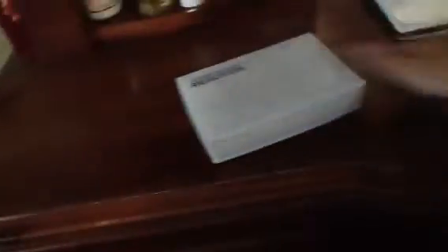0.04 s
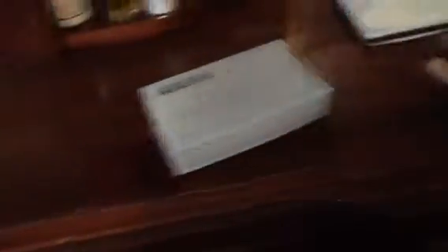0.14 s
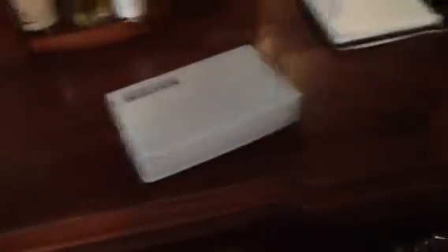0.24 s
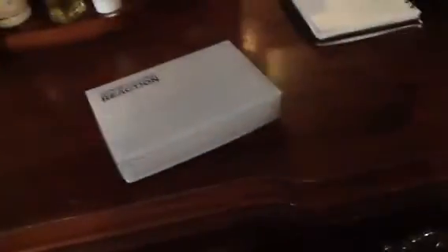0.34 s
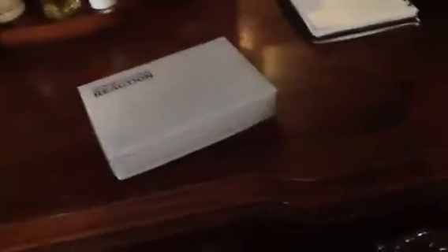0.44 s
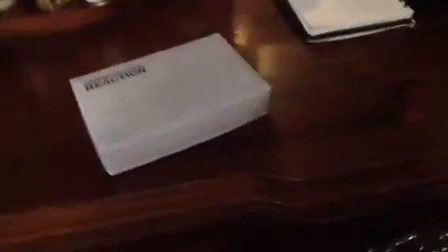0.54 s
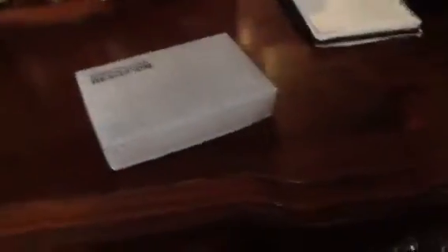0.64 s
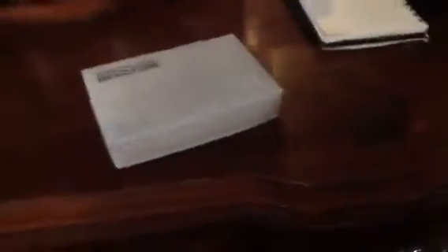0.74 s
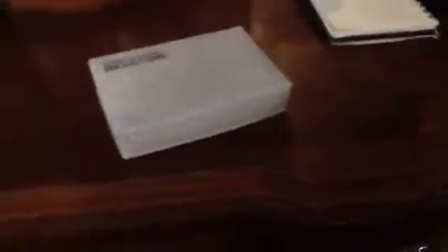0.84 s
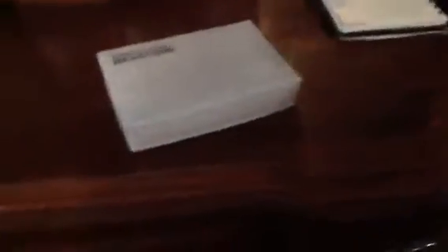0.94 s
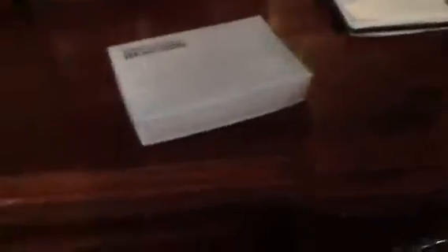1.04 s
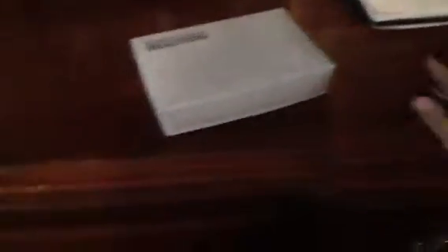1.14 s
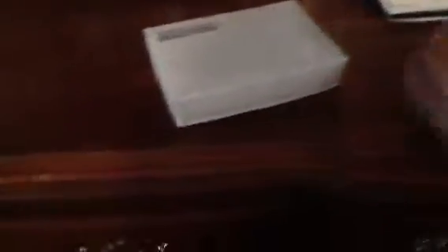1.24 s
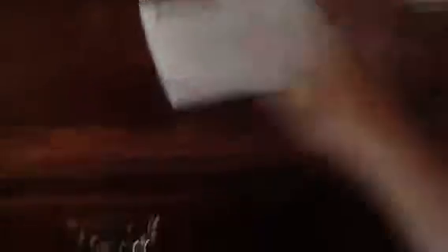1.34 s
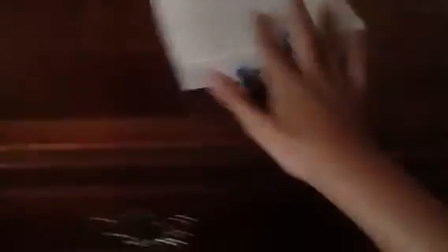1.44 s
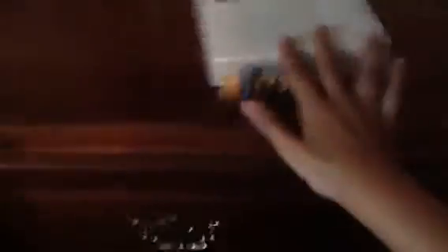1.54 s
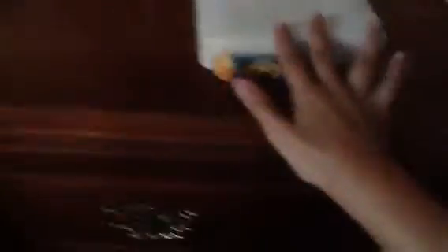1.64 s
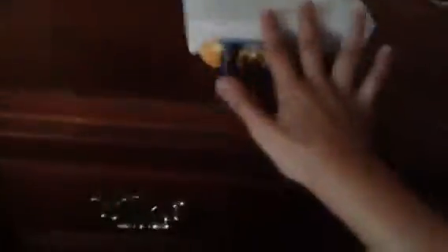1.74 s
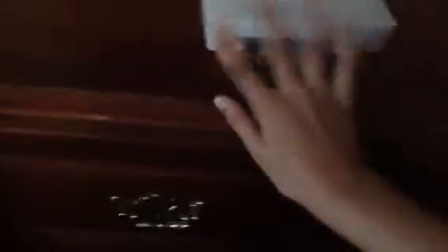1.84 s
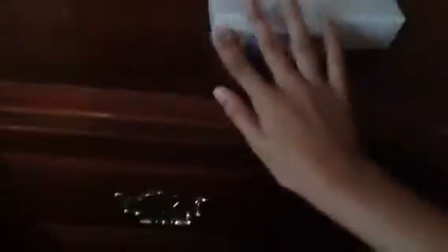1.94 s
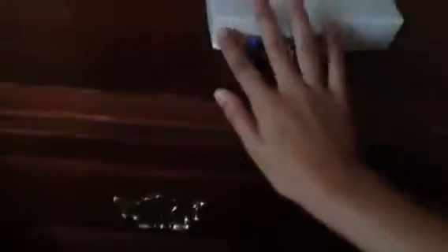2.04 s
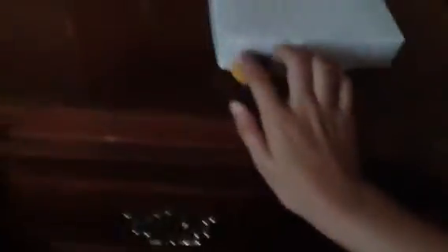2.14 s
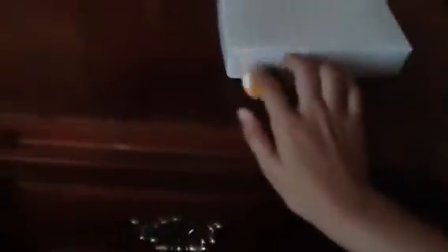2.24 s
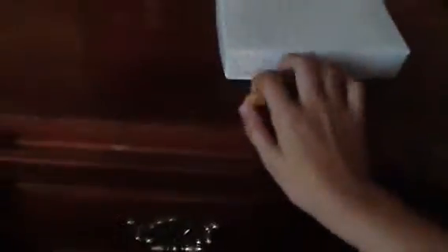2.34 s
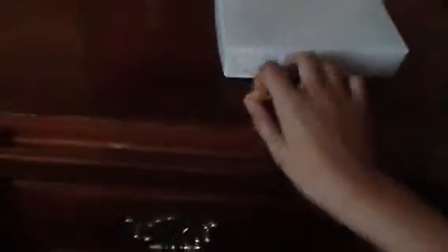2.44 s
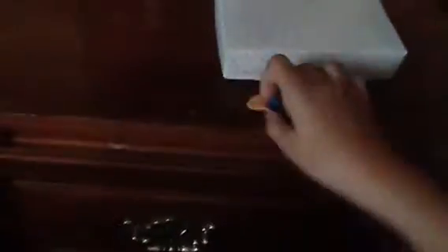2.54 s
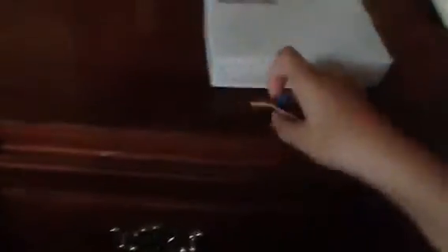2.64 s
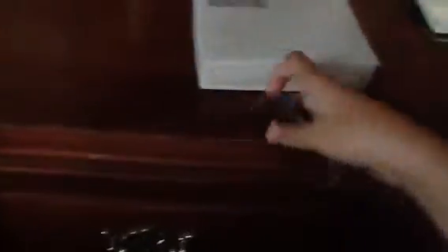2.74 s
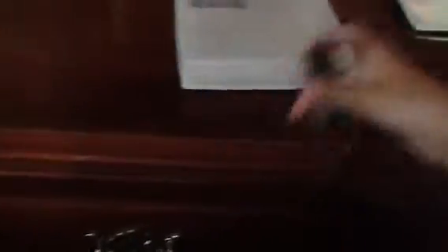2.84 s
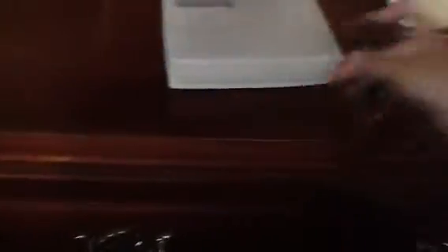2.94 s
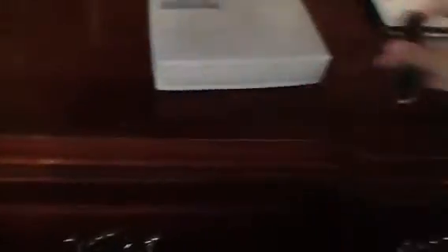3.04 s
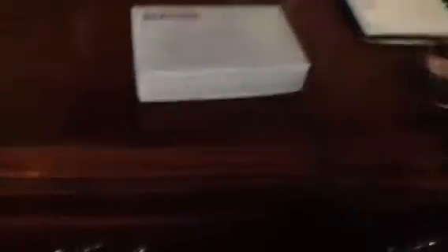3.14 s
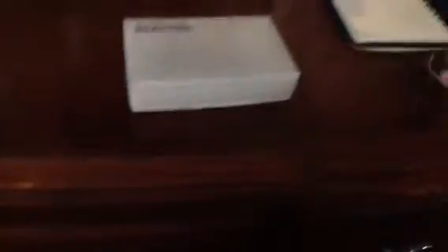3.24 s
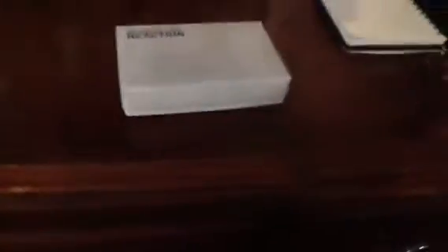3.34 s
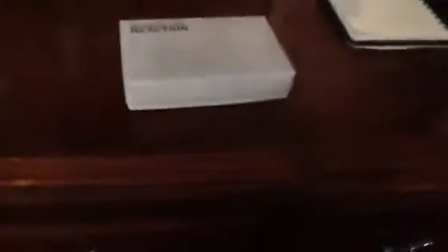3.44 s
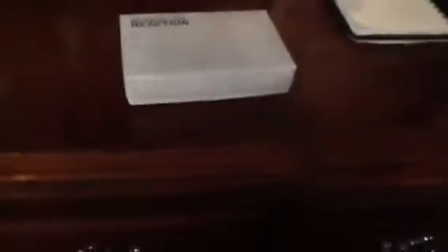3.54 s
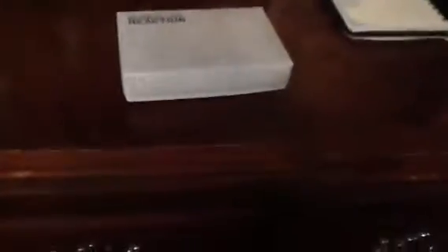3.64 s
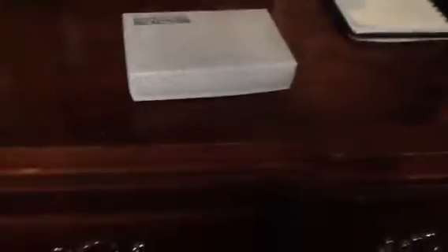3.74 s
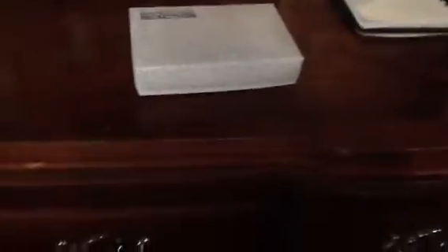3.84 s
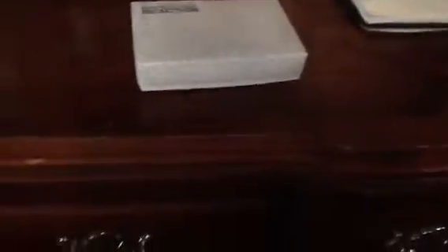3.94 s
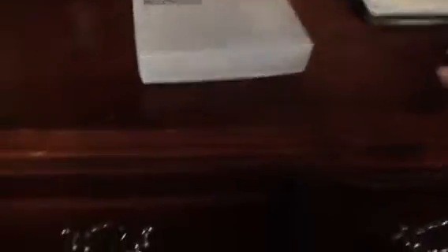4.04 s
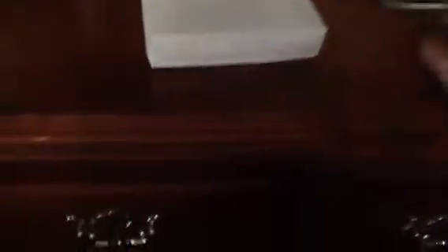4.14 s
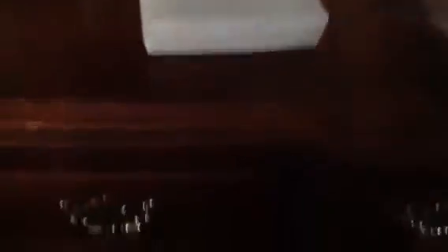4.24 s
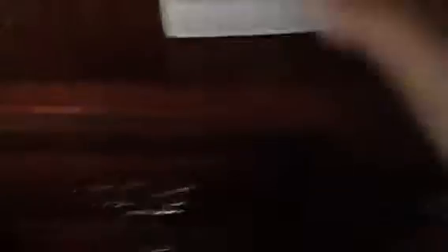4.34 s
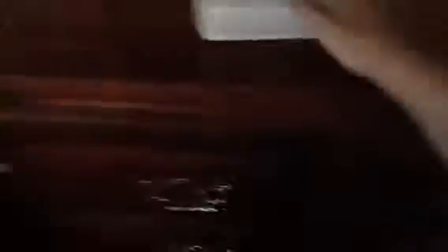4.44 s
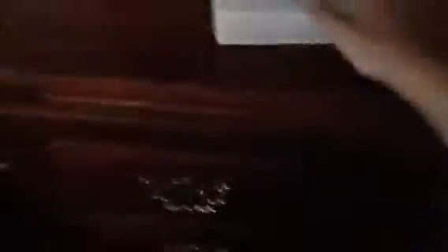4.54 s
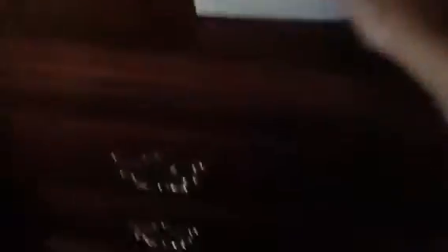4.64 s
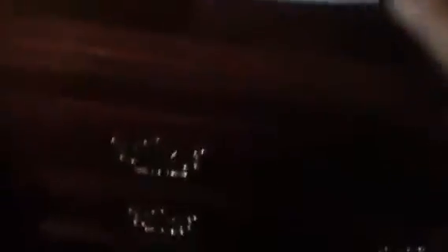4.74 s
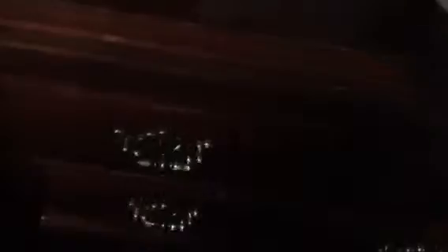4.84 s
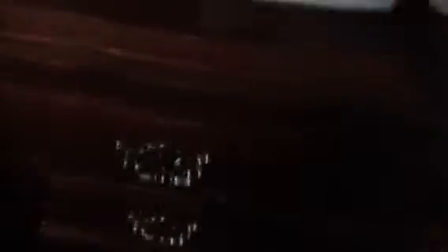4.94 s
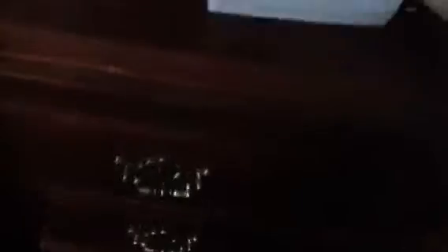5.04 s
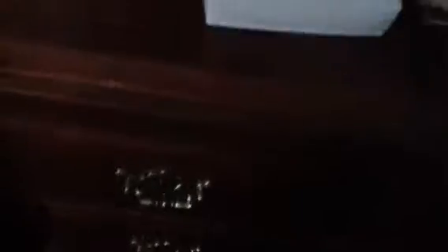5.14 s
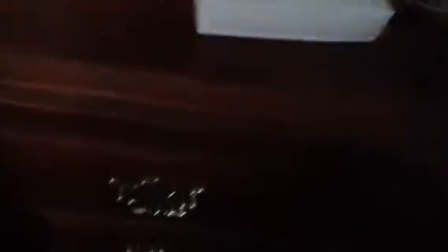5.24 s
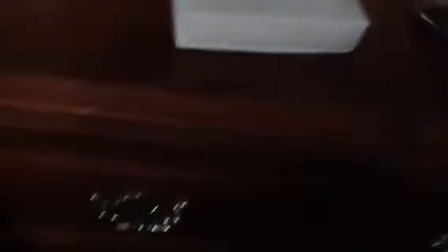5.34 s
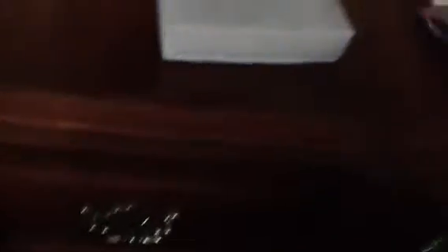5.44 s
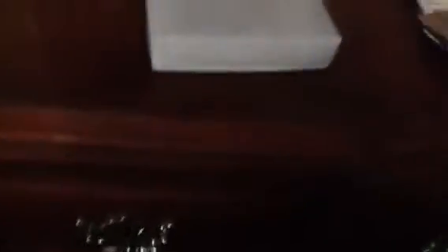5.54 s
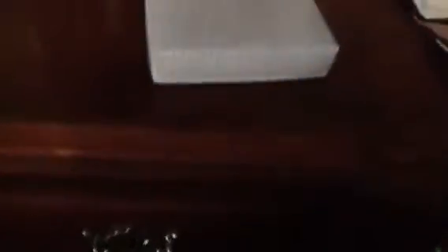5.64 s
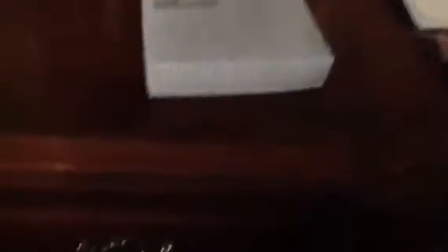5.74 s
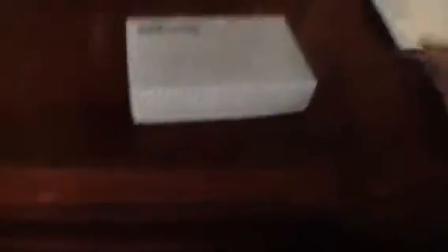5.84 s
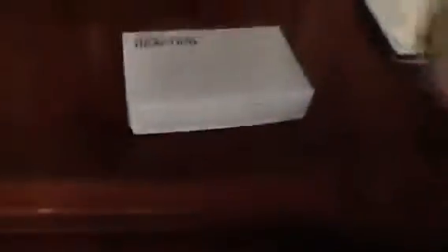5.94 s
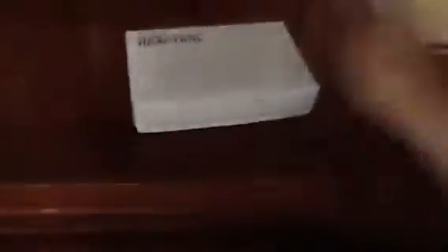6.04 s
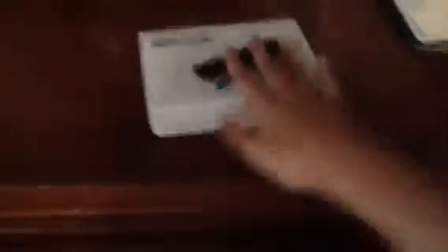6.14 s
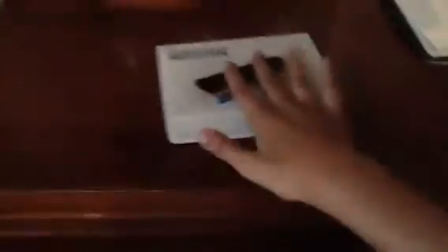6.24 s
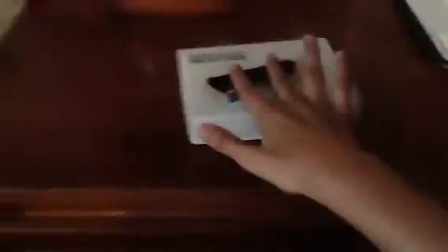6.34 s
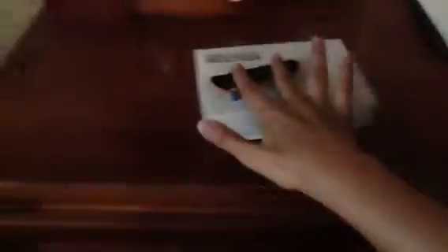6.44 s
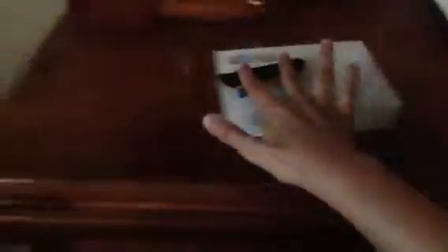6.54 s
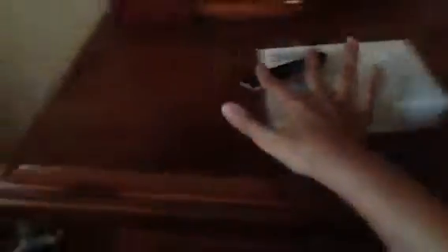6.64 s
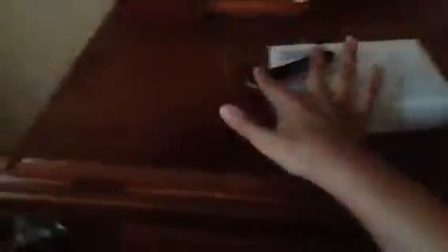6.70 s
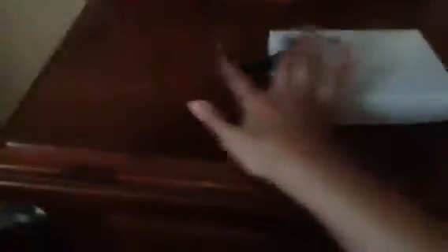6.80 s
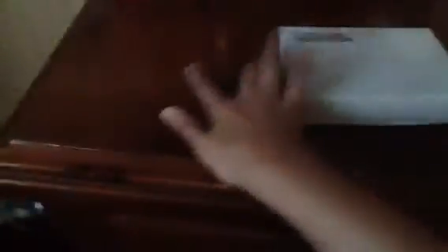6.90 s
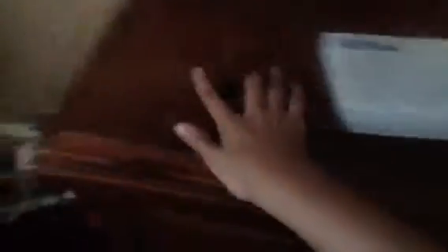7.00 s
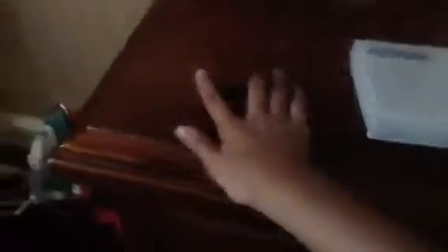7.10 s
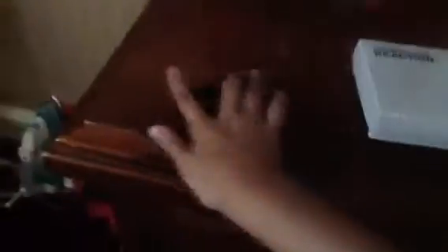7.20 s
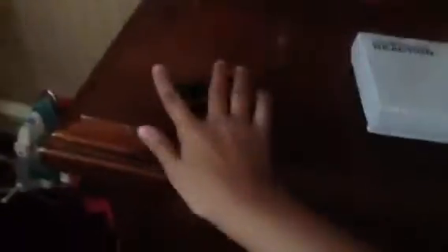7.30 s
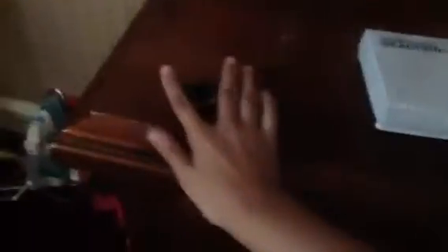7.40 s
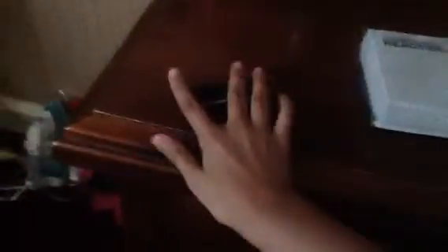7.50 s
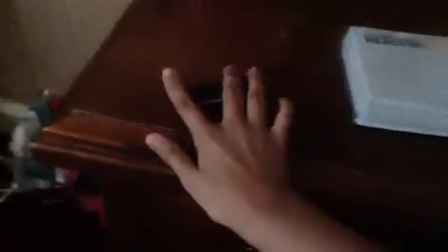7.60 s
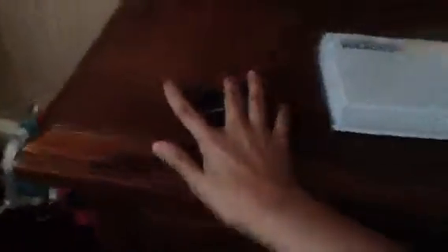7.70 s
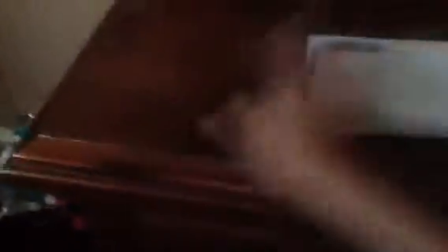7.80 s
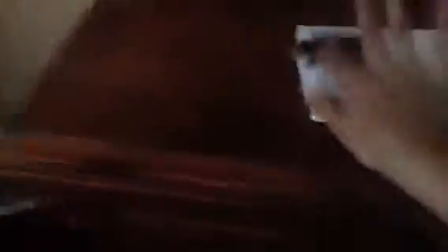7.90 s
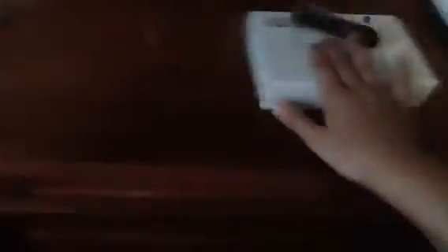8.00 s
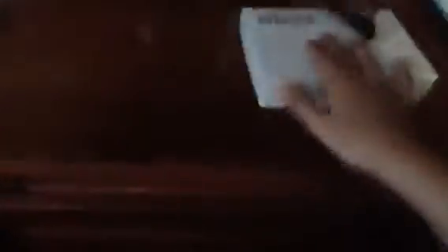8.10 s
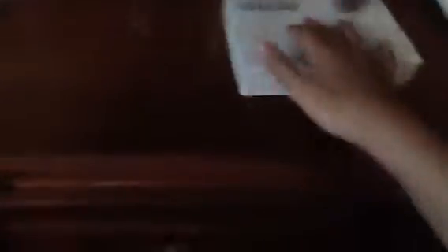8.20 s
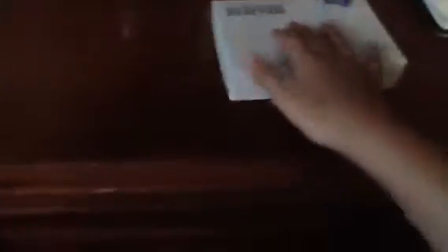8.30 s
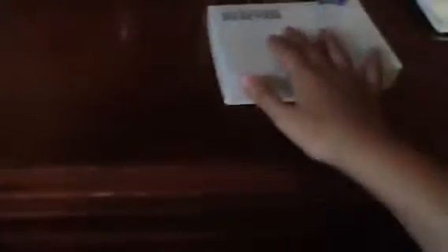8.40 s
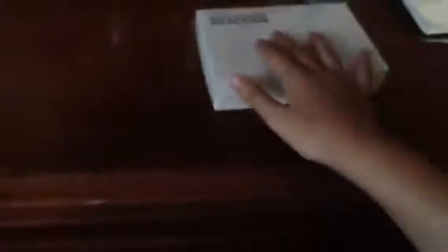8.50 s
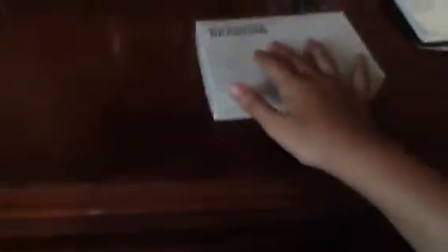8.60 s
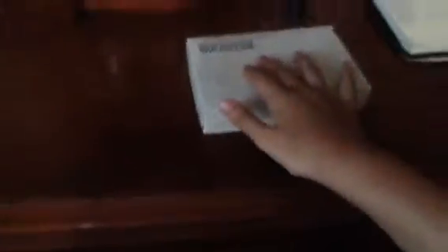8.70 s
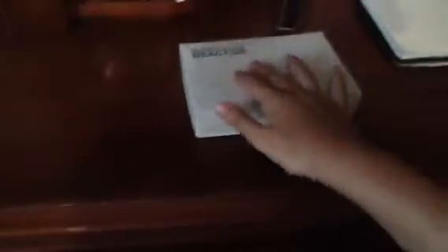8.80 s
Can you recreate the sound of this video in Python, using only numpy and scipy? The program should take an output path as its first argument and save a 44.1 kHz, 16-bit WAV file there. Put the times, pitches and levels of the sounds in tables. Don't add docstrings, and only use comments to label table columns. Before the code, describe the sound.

Sharp clacks and rattles of a miniature skateboard on a hard wood tabletop, between gritty rolling, finger scuffs and soft hand thuds, finally knocking on a hollow card box.

```python
import sys
import numpy as np
from scipy import signal
from scipy.fft import rfft, irfft
from scipy.io import wavfile

SR = 44100
rng = np.random.default_rng(int(sys.argv[2]) if len(sys.argv) > 2 else 0)


def decibels_to_gain(level_db):
    exponent = np.asarray(level_db, float) / 20
    return 10 ** exponent


def store_wav(level_fs):
    pcm = np.round(np.clip(np.atleast_2d(level_fs), -1, 1) * 32767)
    wavfile.write(sys.argv[1], SR, pcm.T.astype(np.int16))


N = 390726


def rms_one(x):
    return x / np.sqrt(np.mean(x ** 2) + 1e-20)


def at_hz(points, hz):
    table_hz, values = np.array(points)[:, 0], np.array(points)[:, 1]
    return np.interp(np.log(hz), np.log(table_hz), values)


def drift(rate_hz):
    r = np.exp(-2 * np.pi * rate_hz / SR)
    wander = signal.lfilter([1], [1, -2 * r, r * r], rng.standard_normal(N + SR))
    return rms_one(wander[SR:])


def colour(x, spectrum):
    hz = np.linspace(0, SR / 2, 513)
    shape = decibels_to_gain(2 * at_hz(spectrum, np.maximum(hz, 1)))
    taps = signal.minimum_phase(signal.firwin2(2047, hz, shape, fs=SR), n_fft=2 ** 16)
    return signal.fftconvolve(x, taps / np.sqrt(np.sum(taps ** 2)))[:len(x)]


def band(x, low_hz, high_hz):
    return signal.sosfilt(signal.butter(2, [low_hz, high_hz], "band", fs=SR, output="sos"), x)


def ring(x, hz, t60_s):
    r, w = decibels_to_gain(-60 / (t60_s * SR)), 2 * np.pi * hz / SR
    return signal.lfilter([0, np.sin(w)], [1, -2 * r * np.cos(w), r * r], x + 1e-18)


def resonance(x, hz, width_hz):
    return rms_one(ring(x, hz, np.log(1000) / np.pi / width_hz))


def strikes(events, levels_db):
    clicks = np.zeros(N)
    clicks[(np.array(events)[:, 0] * SR).astype(int)] = decibels_to_gain(levels_db)
    return clicks


# pitch_hz, level_db
HUSH_COLOUR = [(15, -55), (25, -21), (50, -25), (80, -19), (169, 0.5), (274, 2.5), (614, -5), (666, -5),
               (1950, -13), (3090, -13), (11500, -15.5), (15500, -17)]


def hush():
    noise_db, mains_hz, mains_db = -64, 56, -84
    hz = np.maximum(np.arange(N // 2 + 1) * SR / N, 1)
    noise = irfft(rfft(rng.standard_normal(N)) * decibels_to_gain(at_hz(HUSH_COLOUR, hz)), N)
    mains = np.sin(2 * np.pi * mains_hz * np.arange(N) / SR)
    return decibels_to_gain(noise_db) * rms_one(noise) + decibels_to_gain(mains_db) * mains


# pitch_hz, t60_s
ROOM_T60 = [(150, 0.19), (400, 0.28), (1040, 0.24), (2760, 0.21), (7280, 0.22), (14000, 0.17)]


def room(x):
    t, edges, tails = np.arange(SR // 2) / SR, 100 * 2 ** np.arange(0, 7.6, .5), 0
    for low, high in zip(edges, edges[1:]):
        noise = band(rng.standard_normal((5, len(t))), low, high)
        tails = tails + noise * decibels_to_gain(-60 * t / at_hz(ROOM_T60, np.sqrt(low * high)))
    tails = tails * np.clip((t - .002) / 0.00069, 0, 1)
    place = np.arange(N) // 2900 % len(tails)
    return sum(signal.fftconvolve(x * (place == k), tail / np.sqrt(np.sum(tail ** 2)))[:N]
               for k, tail in enumerate(tails))


# start_s, peak_db, pitch_hz
THUDS = [(0.079, -20.5, 310), (0.105, -22.5, 476), (1.437, -28, 333), (1.293, -25, 237),
         (4.381, -23, 298.6), (4.399, -23, 540), (4.404, -21.5, 276), (7.932, -19, 290), (7.8938, -29, 497),
         (7.928, -16.5, 470), (8.018, -33.5, 516), (2.528, -38, 196), (3.642, -44, 188),
         (4.766, -58.5, 224.5), (5.617, -43, 254), (6.68, -32, 245.1)]


def thuds():
    out, t = np.zeros(N + 4000), np.arange(4000) / SR
    for s, db, hz in THUDS:
        swell = 1 - np.exp(-t * hz / 1.5)
        fade = decibels_to_gain(db + 12.0 - 60 * t / 0.024)
        out[int(s * SR):int(s * SR) + len(t)] += fade * swell * np.sin(2 * np.pi * hz * t)
    return out[:N]


def strokes(rows, swell):
    t = np.arange(0, N + 64, 64) / SR
    power = 0
    for start, top, end, db in rows:
        height = np.sin(np.pi / 2 * np.interp(t, [start, top, end], [0, 1, 0]))
        power = power + decibels_to_gain(2 * db) * height ** (2 * swell)
    return np.interp(np.arange(N) / SR, t, power)


# start_s, strongest_s, end_s, level_db
ROLLS = [(0.08, 0.15, 0.22, -34.5), (0.25, 0.28, 0.56, -33), (0.33, 0.47, 0.63, -37.5),
         (0.71, 0.95, 1.29, -36), (1.21, 1.27, 1.39, -41.5), (1.55, 1.64, 1.745, -37),
         (2.22, 2.27, 2.49, -56.5), (3.27, 3.35, 3.544, -39), (3.55, 3.6, 3.8, -51), (3.7, 3.75, 3.82, -63),
         (3.86, 4.1, 4.34, -44.5), (4.3, 4.35, 4.56, -41.5), (5.07, 5.14, 5.2, -40),
         (5.17, 5.29, 5.4, -40.5), (5.33, 5.43, 5.52, -44.5), (5.62, 5.7, 5.77, -43.5),
         (5.85, 5.915, 5.96, -48.5), (6.3, 6.55, 6.72, -55.5), (6.84, 7.09, 7.4, -46.5),
         (7.31, 7.34, 7.38, -51.5), (7.6, 7.72, 8.04, -53), (7.81, 7.825, 8.15, -43),
         (7.75, 8.01, 8.37, -65.5), (1.41, 1.45, 1.5, -38), (6.97, 6.99, 7.07, -39)]
# start_s, strongest_s, end_s, level_db
SCUFFS = [(-0.05, 0.06, 0.5, -43), (0.3, 0.52, 0.65, -43.5), (0.375, 0.385, 0.41, -39),
          (0.72, 0.74, 0.76, -50.5), (0.83, 0.84, 1.2, -44), (0.88, 0.9, 1.16, -39.5),
          (1.38, 1.46, 1.62, -38), (1.51, 1.58, 1.6, -38), (2.25, 2.3, 2.46, -55.5),
          (2.65, 2.7, 2.7, -52.5), (3.12, 3.2, 3.26, -46.5), (3.36, 3.38, 3.5, -48),
          (3.62, 3.67, 3.69, -54), (3.84, 3.9, 4.2, -56.5), (4.2, 4.32, 4.35, -40), (5.09, 5.1, 5.2, -36.5),
          (5.2, 5.29, 5.33, -35), (5.3, 5.42, 5.5, -47), (5.16, 5.21, 5.8, -49), (1.02, 1.15, 1.13, -52),
          (0.72, 0.8, 0.75, -50.5), (5.71, 5.745, 5.79, -51.5), (5.84, 5.91, 6, -51.5),
          (6.66, 6.84, 6.78, -58), (7.8, 8.01, 8.1, -44), (8.3, 8.57, 8.7, -47), (8.6, 8.7, 8.75, -45)]
# middle_s, half_length_s, level_db
DRAGS = [(0.005, 0.028, -39.5), (0.153, 0.078, -47), (1.553, 0.28, -41.5), (2.272, 0.034, -59),
         (2.504, 0.27, -62), (2.935, 0.11, -56), (3.194, 0.089, -54.5), (3.42, 0.062, -49),
         (3.686, 0.13, -54.5), (3.98, 0.19, -48.5), (4.373, 0.33, -46.5), (4.782, 0.16, -54),
         (5.133, 0.061, -51), (5.29, 0.087, -38.5), (5.37, 0.072, -39), (5.435, 0.25, -45),
         (5.906, 0.058, -43), (6.724, 0.08, -51), (7.985, 0.24, -45), (8.566, 0.08, -49),
         (8.743, 0.36, -43)]


def motion():
    roll_rumble_db, roll_hiss_db, scuff_hum_db = -23.5, -10.5, -18.5
    roll, scuff = strokes(ROLLS, 0.92), strokes(SCUFFS, 1.57)
    drag = strokes([(s - half, s, s + half, db) for s, half, db in DRAGS], 2.08)
    rumble = drag + decibels_to_gain(2 * roll_rumble_db) * roll
    hum = roll + decibels_to_gain(2 * scuff_hum_db) * scuff
    hiss = scuff + decibels_to_gain(2 * roll_hiss_db) * roll
    return [10 * np.log10(power + 1e-9) for power in (rumble, hum, hiss)]


# pitch_hz, level_db, t60_s
TABLE = [(193.6, -1.5, 0.11), (226.4, 0.5, 0.041), (269.7, 0.5, 0.085), (330, -9.5, 0.015),
         (412, -2.5, 0.051), (500, -4, 0.052), (713, -0.5, 0.048)]
# pitch_hz, width_hz, level_db
DECK = [(522.6, 68, -1.5), (704, 52, 2), (829.6, 65, 2), (1025, 91, 2), (1340, 300, 3.5), (1640, 410, -1),
        (2360, 210, -6)]
# pitch_hz, width_hz, level_db
AXLES = [(2940, 190, -18), (3310, 83, -16.5), (5770, 450, -16), (7316, 400, -19.5)]
# pitch_hz, level_db (per Hz)
HISS = [(880, -28), (1500, -7.5), (2400, -4), (3300, -3.5), (4500, -13.5), (6000, -9), (7500, -6),
        (15500, -12.5)]


def rolling():
    rumble_db, hum_db, hiss_db = motion()
    grit = decibels_to_gain(2.0 * np.minimum(rng.exponential(1, N), 3)) * rng.choice([-1, 1], N)
    grit = grit * (rng.random(N) < 15000 / SR)
    grit = grit * decibels_to_gain(1.3 * drift(60))
    rumble = sum(decibels_to_gain(db) * ring(grit, hz, t60) for hz, db, t60 in TABLE)
    hum = sum(decibels_to_gain(db + 2.6 * drift(4.0)) * resonance(grit, hz, width) * (-1) ** k
              for k, (hz, width, db) in enumerate(DECK))
    hiss = colour(grit * rng.choice([-1, 1], N), HISS) * decibels_to_gain(1.5 * drift(18))
    axles = sum(decibels_to_gain(db + 4 * drift(9)) * resonance(grit, hz, width) for hz, width, db in AXLES)
    return (decibels_to_gain(rumble_db - 6.5) * rms_one(rumble)
            + decibels_to_gain(hum_db - 5.5) * (rms_one(hum) + axles)
            + decibels_to_gain(hiss_db - 4.5) * rms_one(hiss))


def squeak(rows, t, waver, throb_db, rag):
    s, hz, level_db = np.transpose(rows)
    gate = np.clip(np.minimum(t - s[0], s[-1] - t) / 0.0019, 0, 1)
    phase = 2 * np.pi * np.cumsum(np.interp(t, s, hz) * (1 + waver)) / SR
    overtones = 0.064 * np.sin(2 * phase) + 0.022 * np.sin(3 * phase)
    return gate * decibels_to_gain(np.interp(t, s, level_db) + throb_db) * (np.sin(phase) + rag * overtones)


# time_s, pitch_hz, level_db
SQUEAKS = [
    [(5.08, 835, -53), (5.128, 826, -45), (5.165, 812, -42.5), (5.22, 800, -48)],
    [(5.095, 1515, -43), (5.13, 1520, -41.5), (5.18, 1477, -46)],
    [(5.645, 818, -45), (5.683, 798, -39.5), (5.76, 830, -53)],
    [(5.25, 426, -53), (5.29, 426, -39), (5.37, 477, -60), (5.45, 325.4, -49.5), (5.48, 320, -48)],
    [(4.75, 606.8, -65), (4.775, 600, -55), (4.8, 600.6, -61.5)],
    [(1.245, 1520, -46), (1.27, 1624, -33.5), (1.287, 1670, -33)],
    [(1.515, 2430, -39), (1.54, 2430, -41), (1.547, 2450, -44)],
    [(5.72, 2654, -50), (5.75, 2690, -53), (5.79, 2650, -64)],
    [(7.815, 913, -37), (7.87, 955, -48), (7.89, 910, -55)],
    [(5.86, 746, -58), (5.915, 750, -46)],
    [(3.355, 1408, -58), (3.375, 1408, -44), (3.43, 1340, -48)],
    [(0.46, 1373, -42), (0.49, 1380, -40), (0.6, 1367, -63)],
    [(4.07, 1385, -53), (4.1, 1390, -49), (4.15, 1390, -61), (4.21, 1366, -46)],
    [(0.28, 520, -44), (0.3, 519, -41), (0.34, 536, -50)],
    [(2.65, 2600, -68), (2.7, 2700, -63), (2.76, 2700, -68)],
    [(5.725, 3600, -56), (5.745, 3700, -54), (5.77, 3700, -63)],
    [(5.8, 1460, -54), (5.83, 1450, -61), (5.9, 1485, -51)],
    [(5.76, 829.4, -59), (5.86, 762, -62)],
    [(7.76, 1478, -57), (7.82, 1500, -38), (7.86, 1497, -44)],
    [(3.46, 800, -44), (3.476, 817, -38.5), (3.51, 830, -56)],
]
# time_s, pitch_hz, level_db
WHISTLES = [
    [(5.712, 1317, -33), (5.724, 1313, -29), (5.737, 1315, -33), (5.746, 1345, -29), (5.76, 1370, -33),
     (5.772, 1370, -40), (5.8, 1340, -48)],
    [(5.745, 1494, -53), (5.76, 1500, -32.5), (5.772, 1510, -48), (5.8, 1480, -55)],
    [(3.165, 950, -56), (3.185, 969, -43), (3.21, 956, -59), (3.24, 972, -44), (3.275, 967, -54)],
    [(7.09, 1408, -50), (7.11, 1415, -41), (7.15, 1436, -47), (7.168, 1425, -65), (7.182, 1446, -45),
     (7.2, 1445, -68), (7.215, 1415, -50), (7.25, 1413, -53), (7.28, 1410, -64)],
    [(4.26, 2410, -52.5), (4.355, 2380, -52.5)],
    [(2.6, 627, -72), (2.77, 621, -59.5), (2.95, 613, -75)],
]


def squeaks():
    slip, throb, rag = drift(300), drift(43), drift(900)
    out = np.zeros(N)
    for table, waver, throb_db in ((SQUEAKS, .075, 3.5), (WHISTLES, .02, 2.5)):
        for rows in table:
            span = slice(int(rows[0][0] * SR), int(rows[-1][0] * SR))
            t = np.arange(N)[span] / SR
            out[span] += squeak(rows, t, waver * slip[span], throb_db * throb[span], rag[span])
    return out


# pitch_hz, level_db (per Hz)
CRACK = [(880, -26), (1500, -3), (2350, -4.5), (5090, -3), (8130, -5.5), (9140, -3), (11300, -4.5),
         (14200, -6.5), (15500, -8.5)]
# start_s, peak_db, pitch_hz
TICKS = [(0.38, -23, 3290), (0.5103, -32, 3250), (0.7876, -38, 3620), (0.838, -25, 6040),
         (0.891, -21, 8000), (1.078, -24, 7750), (1.187, -26, 5770), (1.473, -15, 3680),
         (1.535, -24.5, 2420), (1.424, -20.5, 9000), (1.442, -7.5, 3000), (1.459, -20.5, 3800),
         (1.58, -16.5, 3200), (1.617, -14.5, 2200), (1.652, -28.5, 3420), (1.755, -32, 5500),
         (7.901, -10, 3020), (7.831, -9, 8000), (3.4002, -25.5, 6840), (4.004, -32, 11500),
         (4.0626, -42.5, 8000), (4.091, -32, 12500), (5.104, -22, 3740), (5.1504, -31, 3640),
         (5.198, -27, 3400), (5.2626, -34, 7550), (5.279, -26, 3240), (5.9007, -29, 3540),
         (5.926, -8.5, 5340), (7.1026, -35, 5650), (7.128, -36, 10300), (7.139, -40, 10300),
         (7.185, -36, 10300), (7.193, -42, 10400), (7.199, -39, 10300), (7.224, -39, 10300),
         (7.059, -38, 10040), (7.118, -36, 3000), (7.6538, -39, 10000), (1.3896, -22, 8000),
         (1.524, -18.5, 3800), (2.5501, -23.5, 5640), (2.7348, -29, 7750), (2.7698, -32, 7760),
         (2.8212, -25.5, 7000), (2.8296, -26.5, 7320), (2.843, -37, 7400), (2.8768, -38.5, 3330),
         (3.686, -36, 3200), (5.495, -32, 7340), (6.064, -37, 10000), (6.072, -34, 10000),
         (6.399, -37, 6273), (6.45, -37, 6600), (6.4909, -32, 2840), (7.2188, -31.5, 10100),
         (7.669, -28.5, 7850), (7.7940, -31, 3400), (8.328, -20, 3830), (8.783, -15, 7000)]


def ticks():
    width = 1.1
    out, t = np.zeros(N + 600), np.arange(600) / SR
    noise = colour(rng.standard_normal(N + 600), CRACK)
    for s, db, hz in TICKS:
        span = slice(int(s * SR), int(s * SR) + len(t))
        spit = noise[span]
        part = signal.lfilter(*signal.butter(1, [hz / width, hz * width], "band", fs=SR), spit)
        out[span] += decibels_to_gain(db - 14.0 - 60 * t / 0.016) * (0.86 * rms_one(part) + 0.6 * spit)
    return out[:N]


# start_s, peak_db
SNAPS = [(0.077, -7), (1.288, -2), (1.5477, -4), (1.5976, -17), (1.6656, -12), (4.375, -16), (5.9181, -10),
         (6.1317, -8), (6.8897, -6), (6.9135, -12), (7.8412, -4.5), (7.9278, -19), (8.3791, -17),
         (8.481, -9), (8.6846, -11)]


def snaps():
    clicks = strikes(SNAPS, np.array(SNAPS)[:, 1] + 1.5)
    axle_ping = ring(clicks, 5500, 0.012)
    return colour(clicks, CRACK) + decibels_to_gain(-14) * axle_ping


# start_s, crack_peak_db, rattle_after_db, table_thump_db
CLACKS = [(0.03, -35.5, -4, -40), (2.3199, -21.5, -38, -41), (3.1319, -24, -10.5, -33),
          (3.2289, -36, 2, -63), (3.2805, -20.5, -7, -28.5), (3.461, -30, -8, -45),
          (4.3762, -17, -1.5, -45.5), (4.4417, -19, -5, -26), (4.9405, -28, -1.5, -28),
          (5.3147, -24, -7, -31), (5.9178, -17, -9.5, -28), (6.1406, -11, -49, -20),
          (6.9297, -20.5, 1.5, -34), (6.9636, -15, -16, -18), (7.841, -16, -4, -35),
          (8.0191, -26, -1.5, -33), (8.041, -21, -26.5, -34), (8.079, -23.5, -23, -65),
          (8.294, -23, -9, -29), (8.593, -25, -5, -26), (8.6614, -21, -14, -26), (8.796, -22, -7.5, -30.5)]
# start_s, crack_peak_db, deck_ring_db, deck_pitch_hz, table_thump_db
LOOSE = [(1.2683, -37, -40, 1660, -38.5), (1.6893, -33, -20.5, 2277, -31.5),
         (2.7543, -35.5, -36, 1082, -64), (4.9065, -26.5, -32, 1520, -28), (5.6465, -40, -39, 850, -44),
         (6.1287, -19.5, -22, 716, -39), (6.8897, -15, -24, 2360, -24), (6.9808, -17.5, -17.5, 1370, -48.5),
         (7.8175, -27.5, -34, 905, -53.5), (7.8932, -19, -24, 910, -25.5),
         (7.9132, -20.5, -27, 1930, -47.5), (7.9284, -15.5, -16, 1520, -19),
         (8.6822, -18, -23, 3450, -18.5)]
FIRM = [(0.0684, -18.5, -34, 2270, -16.5), (0.0773, -10, -14.5, 3100, -11.5), (0.0861, -21, -15, 1640, -24),
        (0.2563, -33, -33, 1340, -45), (1.288, -14, -19.5, 1680, -29), (1.4376, -18.5, -26.5, 810, -28),
        (1.4542, -22, -18.5, 1230, -30.5), (2.2495, -66.5, -39.5, 1134, -49), (2.3038, -38, -41, 1810, -48),
        (3.2968, -25, -22.5, 1340, -33), (4.2166, -18.5, -30, 790, -26),
        (4.3987, -14.5, -18.5, 2300, -22.5), (5.4101, -35.5, -44, 1150, -36),
        (5.5112, -32, -33.5, 1038, -31.5), (6.1325, -15, -19.5, 2580, -22.5), (6.7364, -47, -46, 2000, -61),
        (6.9133, -15.5, -27, 1590, -24.5), (6.9575, -20.5, -30, 850, -20.5),
        (7.3172, -39.5, -40, 1060, -67), (8.4808, -18.5, -20.5, 1730, -26),
        (8.749, -21.5, -27.5, 1430, -25.5), (8.8159, -31, -37, 1440, -35)]
TIGHT = [(1.2156, -35, -29.5, 1340, -46), (1.4008, -21.5, -17.5, 1770, -31),
         (1.4257, -22, -22.5, 1330, -36), (1.4716, -28, -25, 1000, -51), (1.547, -6.5, -15, 1714, -26),
         (1.5968, -16, -13.5, 2180, -33), (1.6143, -31, -22.5, 1190, -39),
         (1.666, -15.5, -15.5, 1686, -29.5), (3.378, -36.5, -34, 1400, -53.5),
         (4.358, -17, -22.5, 800, -35), (4.3798, -21, -16.5, 1680, -13.5),
         (8.366, -24.5, -23.5, 1500, -50.5), (8.3795, -13, -19, 1694, -20.5),
         (8.5406, -22.5, -32.5, 2600, -24.5), (8.6224, -24.5, -31.5, 1340, -23)]


def contacts():
    held_deck_db, held_deck_hz = -26.5, 950
    rows = [(s, db, rattle_db, db + held_deck_db, held_deck_hz, thump_db)
            for s, db, rattle_db, thump_db in CLACKS]
    for grip, rattle_db in ((LOOSE, -2), (FIRM, -4.5), (TIGHT, -13.5)):
        rows += [(s, db, rattle_db, *rest) for s, db, *rest in grip]
    return sorted(rows)


# pitch_hz, level_db, t60_s
BOX = [(205, 6, 0.04), (170, -1, 0.05), (680, -4, 0.03)]


def knocks():
    on_box_from_s, box_shield_db = 8.2, -15
    table_lag_s, box_lag_s = 0.0015, 0.001
    blows = contacts()
    s, _, _, deck_db, deck_hz, thump_db = np.transpose(blows)
    deck, t = np.zeros(N + 2000), np.arange(2000) / SR
    partners = rng.uniform(-1.4, 1, (len(s), 2))
    for at, db, hz, (up, down) in zip((s * SR).astype(int), deck_db, deck_hz, partners):
        tones = ((1, 1), (1.204 + 0.13 * up, .6), (0.82 + 0.05 * down, 0.55))
        chord = sum(height * np.sin(2 * np.pi * ratio * hz * t) for ratio, height in tones)
        deck[at:at + len(t)] += decibels_to_gain(db + 7.5 - 60 * t / 0.013) * (1 - np.exp(-t / 0.001)) * chord
    chance = rng.standard_normal((len(s), len(TABLE)))
    box_time = np.arange(N) > on_box_from_s * SR
    box = sum(ring(strikes(blows, thump_db + db) * box_time, hz, t60) for hz, db, t60 in BOX)
    thump = np.roll(box, int(box_lag_s * SR))
    table_db = thump_db - 3.5 + box_shield_db * (s > on_box_from_s)
    for k, (hz, db, t60) in enumerate(TABLE):
        thump = thump + ring(strikes(blows, table_db + db + 2.66 * chance[:, k]), hz, t60) * (-1) ** k
    soft = np.exp(-2 * np.pi * 500 / SR)
    thump = signal.lfilter([1 - soft], [1, -soft], thump)
    return deck[:N] + np.roll(thump, int(table_lag_s * SR))


def touch(levels_db, rise_s, fade_s):
    rise, fade = np.exp(-1 / (rise_s * SR)), np.exp(-1 / (fade_s * SR))
    clicks = strikes(contacts(), levels_db) + 1e-18
    return signal.lfilter([1 - rise], np.convolve([1, -rise], [1, -fade]), clicks)


# pitch_hz, level_db (per Hz)
RATTLE = [(180, -37.5), (300, -5), (509, -5), (2440, -6.5), (2610, -6.5), (4650, -16.5), (5570, -4.5),
          (10100, -16.5), (13600, -12.5), (15500, -22.5)]


def cracks():
    blows = contacts()
    _, crack_db, rattle_db = np.transpose(blows)[:3]
    sharp_db = np.clip(0.5 * (crack_db + 12.0), -30, 0)
    swell = touch(crack_db + sharp_db, 0.00013, 0.0013) + touch(crack_db - 0.5, 0.0052, 0.0019)
    spiky = rng.standard_normal(N) * decibels_to_gain(3.5 * drift(1500))
    out = colour(swell * rms_one(spiky), CRACK)
    build = np.exp(-1 / (0.00074 * SR))
    energy = signal.lfilter([1 - build], [1, -build], strikes(blows, 2 * (crack_db + rattle_db)) + 1e-18)
    noise, edges = colour(rng.standard_normal(N), RATTLE), 260 * 2 ** np.arange(0, 6.1, .75)
    for low, high in zip(edges, edges[1:]):
        t60_s = 0.51 * at_hz(ROOM_T60, np.sqrt(low * high))
        keep = decibels_to_gain(-120 / (t60_s * SR))
        dying = np.sqrt(signal.lfilter([1], [1, -keep], energy)) * decibels_to_gain(2.0 * drift(66))
        out = out + dying * band(noise, low, high)
    return out


def scene():
    wood = knocks() + thuds()
    hard = cracks() + ticks() + snaps()
    moving = rolling() + squeaks()
    near = wood + hard + moving
    near = near + room(decibels_to_gain(-8.0) * (wood + hard + moving))
    low_cut = signal.butter(4, 168, "high", fs=SR, output="sos")
    return (signal.sosfilt(low_cut, near) + hush())[None]


def band_limit(x):
    return signal.sosfilt(signal.butter(12, 16530, fs=SR, output="sos"), x)


def record(dry):
    rounded = 1.2 * np.tanh(dry / 1.2)
    top_cut = signal.ellip(8, .3, 32, 15250, fs=SR, output="sos")
    return band_limit(signal.sosfilt(top_cut, rounded))


dry = scene()
out = record(dry)
store_wav(out)
```